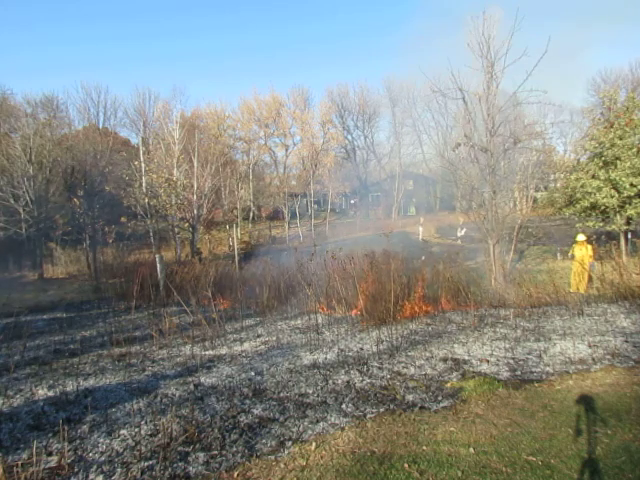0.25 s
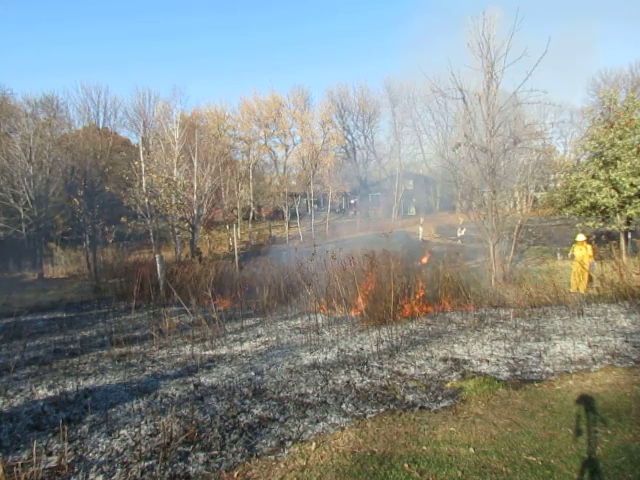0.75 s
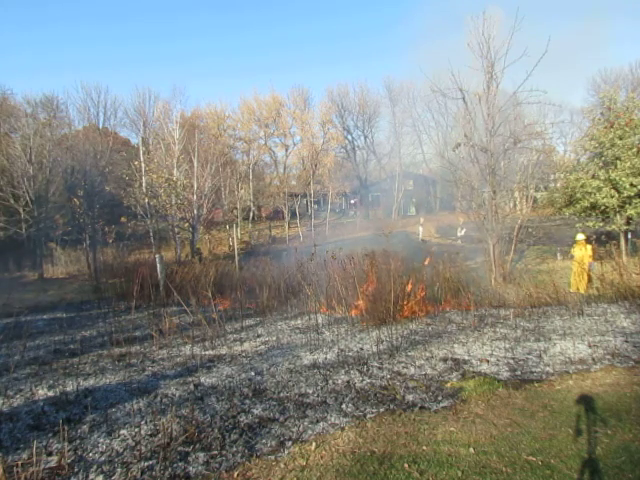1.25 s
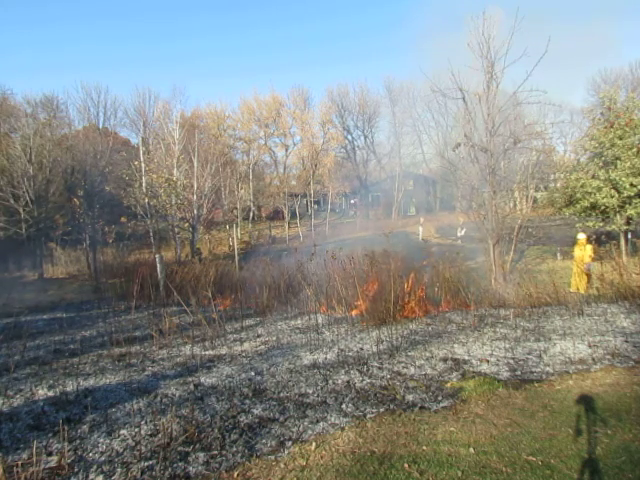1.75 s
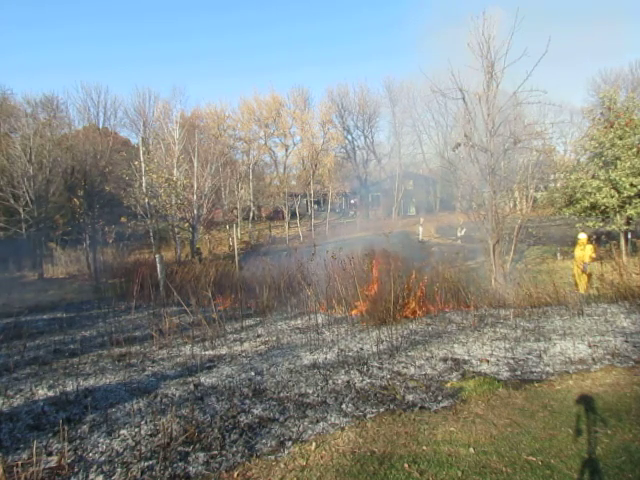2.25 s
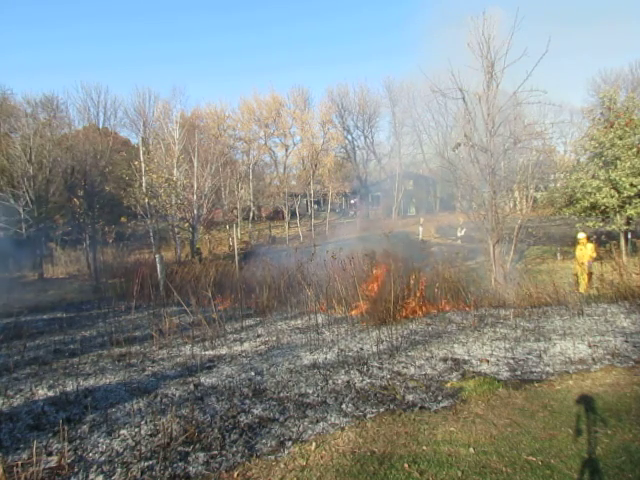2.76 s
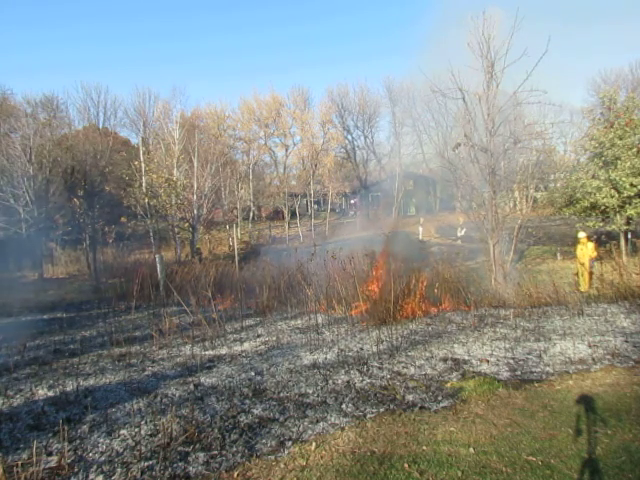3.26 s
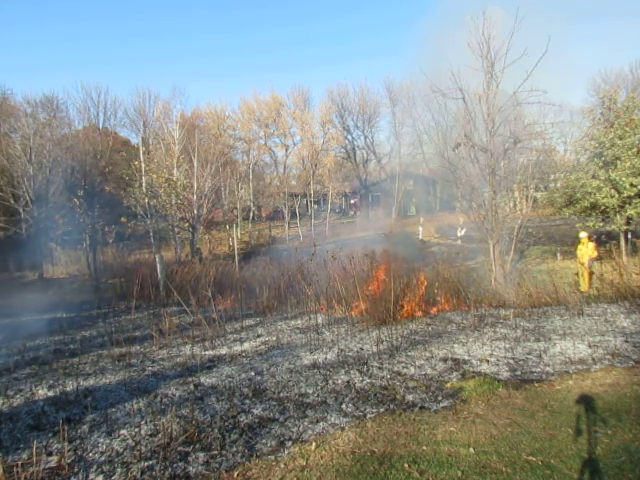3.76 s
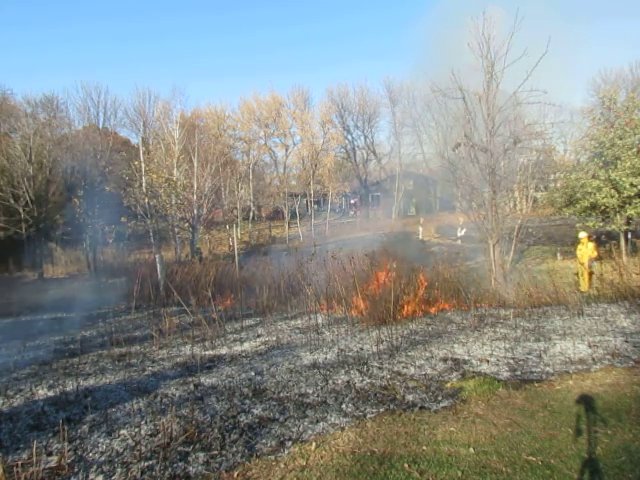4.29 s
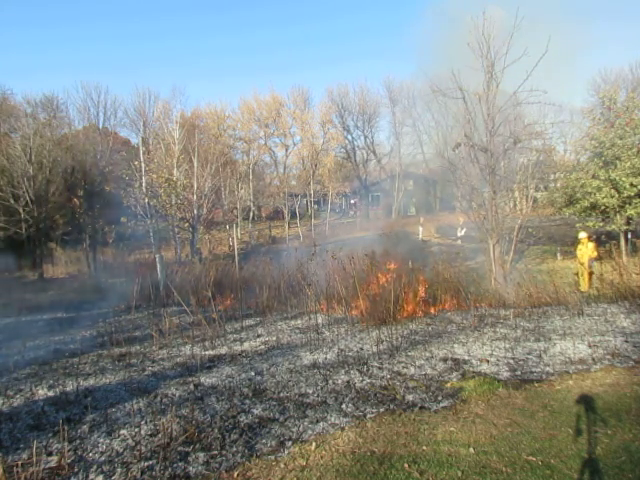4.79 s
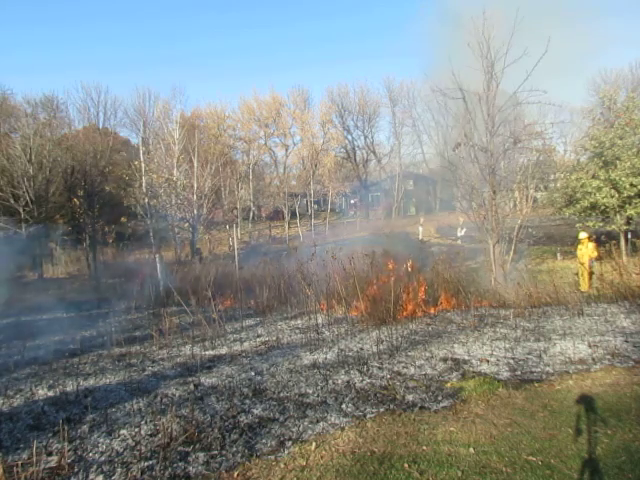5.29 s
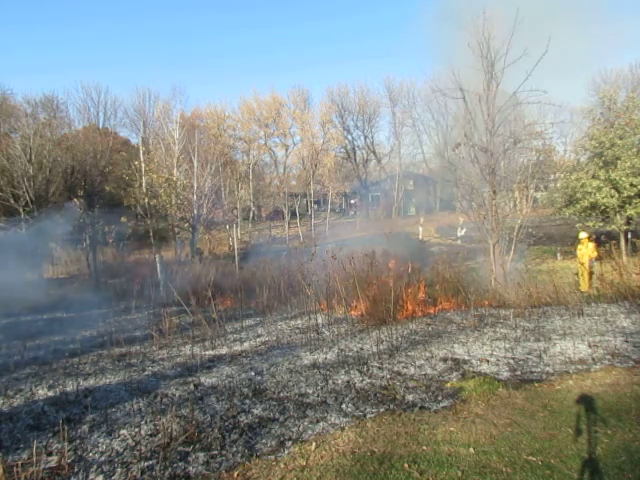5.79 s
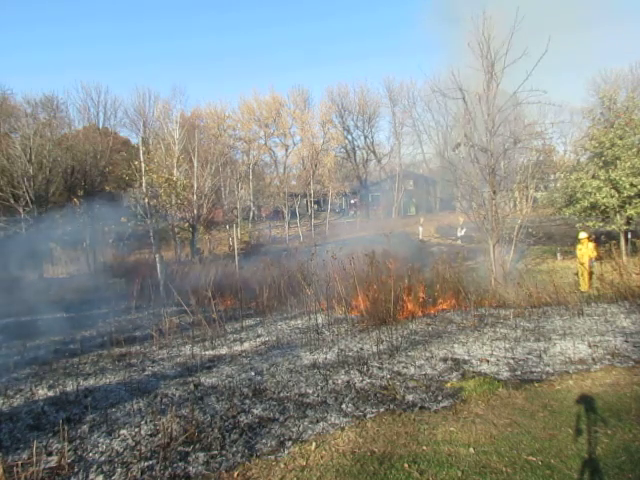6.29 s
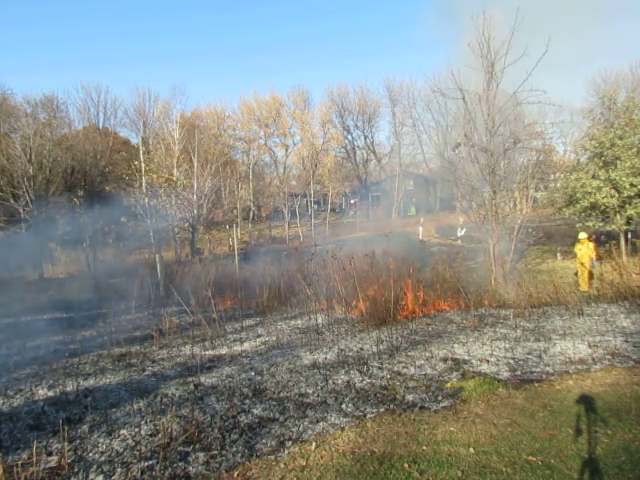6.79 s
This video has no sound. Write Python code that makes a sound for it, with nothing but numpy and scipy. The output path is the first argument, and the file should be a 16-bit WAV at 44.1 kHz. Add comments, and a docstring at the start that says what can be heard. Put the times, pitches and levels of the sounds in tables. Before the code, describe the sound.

Steady crackling of burning brush in an open field, heard in stereo from nearby. Sharp snaps come singly or in quick clusters, each sparking a brief flurry of small clicks and a faint scattered tail off plants and trees. Behind them lies a crisp, fluctuating hiss of flame and a soft low murmur. Breeze gently buffets the microphone, more in the second half, and loud cracks close the stretch.

```python
"""Burning stand of dry stalks

A fire eats through tall dry stalks in an open field, a little way off. Steam bursts the stalks: each pop
is a noisy snap, a resonant hollow and a dull puff. Thin stems tick, and random clicks make a haze of crackles.
Dense grains of noise make the hiss, which rushes up as tufts flare. Ground, stalks, bushes and trees
scatter the cracks; shaped noise gives a low rumble and a breeze that buffets the microphone.
"""
import sys
import numpy as np
from scipy import signal
from scipy.fft import rfft, irfft, next_fast_len
from scipy.io import wavfile

SR = 44100
rng = np.random.default_rng(int(sys.argv[2]) if len(sys.argv) > 2 else 0)


def digitize_waveform(pressure):
    """Quantize a signal to 16-bit integers and store it at the path in sys.argv[1].

    Rows of a 2-D input are taken as channels; values are limited to [-1, 1].
    """
    field = np.atleast_2d(pressure).T
    bounded = np.clip(field, -1, 1)
    quanta = np.round(bounded * 32767).astype(np.int16)
    wavfile.write(sys.argv[1], SR, quanta)


N = 310460

# Bursting hollow stalks: start_s, snap_db, pitch_hz, quality (of the resonance), ring_db, ground_delay_s
POPS = [(0.3387, -3, 3000, 1.35, 5, 0.00015), (0.3711, -4.5, 2450, 0.78, 2, 0.000094),
        (0.4143, 2.5, 4100, 0.86, 6.5, 0.00015), (0.548, -8, 3150, 1.2, -0.5, .0001),
        (0.6496, -8.5, 2600, 0.84, -0.5, 0.00023), (0.6958, -15, 2480, 0.91, 1, 0.00023),
        (0.836, 9.5, 1720, 0.98, 7.5, 0.00026), (1.1837, 6, 2480, 0.5, 6, .00027),
        (1.3072, 8.5, 1510, 0.82, 18, .00027), (1.7085, 2.5, 1900, 0.85, -1, 0.00022),
        (2.1103, 6, 6000, 0.45, 4, 0.00012), (2.1208, 4, 3180, 3, 1.5, 0.00025),
        (2.6275, 3, 2100, 0.8, 6, 0.00027), (2.6935, -9, 2600, 1.55, 10, .00021),
        (2.7513, -11, 1000, 0.12, -7, 0.00031), (3.1455, 1.5, 6270, 1.1, 1, 0.000085),
        (3.1859, 0.5, 8600, 1.1, 6, 0.000086), (3.3074, 2, 1320, 2.4, 0, 0.000079),
        (3.8328, 2, 2300, 0.34, 1, .00011), (4.2644, -1, 1520, 0.53, 0, 0.00034),
        (4.309, -3.5, 2800, 0.45, -4, .00011), (5.1259, -10, 2800, 3.4, -2, .0003),
        (5.153, -26, 1920, 0.84, -5.5, 0.000096), (5.3106, 4, 3020, 4.9, 21.5, .00011),
        (5.8443, -5, 1350, 1.55, 14.5, .00036), (6.9249, 6, 1480, 0.98, 25.5, .00026),
        (7.0047, 14.5, 4400, .7, 23.5, .00013)]
# The loudest thin stems snapping: start_s, level_db, pitch_hz (of the wood)
TICKS = [(0.1356, -4, 7000), (0.1756, -6.5, 4400), (0.319, -1.5, 2400), (0.5143, -3.5, 7200),
         (0.5295, -8, 7000), (0.5565, -11, 7000), (0.632, -10, 3500), (0.8284, 0, 7000), (0.8578, -4, 7000),
         (1.6046, -0.5, 6900), (1.6336, -7.5, 5100), (1.77, -7.5, 9050), (1.9753, -6, 7000),
         (2.2106, -3.5, 3000), (2.2772, -3, 7050), (2.4463, -3.5, 4530), (3.04, -4, 3000),
         (3.155, -1.5, 3500), (3.3782, -11.5, 7000), (3.6248, -4, 7300), (3.8387, 2, 2500),
         (3.9085, -0.5, 5000), (4.0224, -9, 2500), (4.1936, 1.5, 8400), (4.4682, -2, 3530),
         (4.473, -0.5, 4600), (4.5996, -2.5, 8000), (4.655, -5, 2500), (5.2467, -1.5, 6950),
         (5.3058, 0, 4000), (5.5998, -9.5, 7040), (5.6572, -9, 7000), (5.883, -8.5, 3500),
         (6.5955, -0.5, 2840), (6.6079, -4.5, 8100), (6.6658, -4, 4020)]
# Strength of the breeze on the microphone, before its overall level: time_s, relative_level_db
BREEZE = [(0, -36), (0.85, -51), (1.1, -46.5), (2.0, -41), (2.65, -33), (3.55, -45.5), (4.55, -29.5),
          (5.1, -30.5), (5.35, -35.5), (6.2, -33), (7.04, -35.5)]
# Single eddies that hit the microphone: centre_s, peak_db, half_width_s (before skewing)
BUFFETS = [(5.1521, -2.5, 0.0013)]
# How fiercely the fire burns, of which only the swing about the mean counts: time_s, level_db
HEAT = [(0.0, -48.5), (0.55, -45), (0.94, -48), (1.41, -52.5), (2.37, -48), (2.84, -44), (3.33, -44.5),
        (4.39, -43), (5.29, -48.5), (5.71, -48.5), (5.92, -54), (7.04, -48.5)]
# Tufts that catch, swell and die down: peak_s, peak_db, swell_s, depth (0 front to 1 back of the stand)
FLARES = [(0.16, -42, 0.078, 0), (0.37, -44, 0.08, 0.4), (0.72, -43.5, 0.11, 0.9), (1.26, -47.5, 0.3, 0.25),
          (2.72, -34, 0.23, 0), (3.37, -42, 0.077, 0.16), (3.86, -41, 0.09, 0.55), (4.32, -44.5, 0.07, .7),
          (6.96, -31.5, 0.029, 0.6)]

# Tone of snapping walls and stems: frequency_hz, level_db (per Hz)
SNAP_TONE = [(300, -14), (1000, -13), (2000, -8.5), (3000, -6), (5000, -2.5), (8000, .5), (10000, -1.5),
             (12000, -3), (14500, -10.5)]
# Tone of sizzling leaves: frequency_hz, level_db (per Hz)
SIZZLE_TONE = [(500, -1), (2000, 0), (4000, -7.5), (6000, -8.5), (8200, 4.5), (10000, -2), (12000, 3.5),
               (14000, -4), (16000, -45)]
# Tone of rushing flames: frequency_hz, level_db (per Hz)
FLARE_TONE = [(400, -12), (1100, -11), (2200, -11), (3400, -5), (4800, .5), (8000, -2.5), (12000, -5.5),
              (15500, -7)]
# Tone of the hiss from further back in the stand: frequency_hz, level_db (per Hz)
BACK_TONE = [(500, -0.5), (1100, 2.5), (2000, -4), (3200, 1.5), (6000, -1.5), (14000, -28)]
# Tone of the low murmur: frequency_hz, level_db (per Hz)
RUMBLE_TONE = [(20, -17.5), (45, -0.5), (62, 0), (90, -3.5), (140, -4.5), (220, -10.5), (370, -15.5),
               (600, -22), (950, -25), (1800, -38.5), (4000, -46.5)]
# Tone of the eddies at the microphone: frequency_hz, level_db (per Hz)
WIND_TONE = [(20, -10), (60, 4.5), (107, -1), (173, -9.5), (346, -30.5), (600, -29.5), (2000, -55)]
# Stereo lean of the fire: frequency_hz, left_minus_right_db
FIRE_SIDE = [(300, -13.5), (1100, -2.5), (2000, -5), (3000, -4.5), (5000, 2), (6800, -0.5), (8200, -1),
             (11500, -5), (14000, 3)]

# Hiss layers: level at mean heat in dB, share of the heat's dB swing
SIZZLE_DB, SIZZLE_FOLLOWS = -47.5, 0.52
RUSH_DB, RUSH_FOLLOWS = -51.5, 0.53
BACK_DB, BACK_FOLLOWS = -55, 0.5
FLARE_FADE = 1.25   # a tuft's dying time over its swell time
# Small crackles: base rate at mean heat, share of the heat's dB swing
CRACKLES_PER_S, CRACKLES_FOLLOW = 69, 0.36
# After each pop or loud tick: extra share of the crackle rate, and its decay time
FLURRY_GAIN, FLURRY_S = 1.8, 0.038
# Weaker ticks: level at mean heat, random range either way, share of the heat's dB swing
LESSER_TICK_DB, LESSER_SPREAD_DB, LESSER_FOLLOWS = -11.5, 2.5, 0.4
GROUND_ECHO, GROUND_CUT_HZ = 0.78, 6500   # gain of the ground's echo at low pitch, where it dulls
FAR_SEND_DB = -16   # how much of the hollow's note is sent to the trees
CUTOFF_HZ = 16100

TIME = np.arange(N) / SR
SIZE = next_fast_len(N + SR)   # padded length for filtering
HZ = np.maximum(np.arange(SIZE // 2 + 1) * SR / SIZE, 1)


def fire():
    """Pops, ticks, crackles and three kinds of hiss, with a stereo lean that varies with pitch."""
    heat_db = heat()
    front_power, back_power = flares()
    snaps, hollows, carried = pops(puff_db=-22.0, puff_hz=660, puff_quality=0.18)
    small = ticks() + crackles(level_db=-30.0, ring_db=1, clump_db=1.5, quality=3.8)
    cracks = field(snaps + small, hollows, carried)
    sizzle_gain = from_db(SIZZLE_DB + SIZZLE_FOLLOWS * heat_db)
    # Flaring tufts add their power to the steady rush
    rush_gain = from_db(RUSH_DB + RUSH_FOLLOWS * heat_db)
    flare_gain = np.sqrt(rush_gain ** 2 + front_power)
    steady_back_gain = from_db(BACK_DB + BACK_FOLLOWS * heat_db)
    back_gain = np.sqrt(steady_back_gain ** 2 + back_power)
    sizzle = sizzle_gain * fizz(SIZZLE_TONE, per_s=3000, spread_db=4.0, flicker_db=4.5, alike=0.19)
    flare = flare_gain * fizz(FLARE_TONE, per_s=22000, spread_db=4.0, flicker_db=2.0, alike=0.41)
    back = back_gain * fizz(BACK_TONE, per_s=4800, spread_db=7.5, flicker_db=3.5, alike=0.63)
    left, right = cracks + sizzle + flare + back
    side_db = at_hz(FIRE_SIDE) / 2
    return np.array([colour(left, side_db), colour(right, -side_db)])


def pops(puff_db, puff_hz, puff_quality):
    """Each burst is a bright snap of the wall, a few cycles of the hollow and a dull puff of steam."""
    snaps, hollows, carried = np.zeros((3, N))
    for start_s, snap_db, hz, quality, ring_db, delay_s in POPS:
        snap = from_db(snap_db) * tear(level_db=-4.5, t60=0.003)
        push = -from_db(ring_db) * signal.unit_impulse(len(snap))
        hollow = ring(ring(push, hz, quality), hz, quality)
        puff = from_db(puff_db) * ring(push, puff_hz, puff_quality)
        add(snaps, start_s, off_ground(snap, delay_s))
        add(hollows, start_s, off_ground(hollow + puff, delay_s))
        add(carried, start_s, from_db(FAR_SEND_DB) * off_ground(hollow, delay_s))
    return colour(snaps, at_hz(SNAP_TONE)), hollows, carried


def tear(level_db, t60):
    """A wall splits in one sharp crack and a few lesser ones just after; energy 1, 20 ms long."""
    t = TIME[:SR // 50]
    splinters = rng.standard_normal(len(t)) * from_db(-60 * t / t60)
    splinters /= np.linalg.norm(splinters)
    crack = -signal.unit_impulse(len(t)) + from_db(level_db) * splinters
    return crack / np.linalg.norm(crack)


def ticks():
    """Thin stems snap brightly, each with a short woody ring."""
    out = np.zeros(N)
    for start_s, level_db, hz in TICKS + lesser_ticks(count=32):
        snap = from_db(level_db) * tear(level_db=2.5, t60=0.0017)
        wood = from_db(-7) * ring(snap, hz, quality=1.5)
        add(out, start_s, snap + wood)
    return colour(out, at_hz(SNAP_TONE))


def lesser_ticks(count):
    """Weaker snaps, one somewhere in each equal stretch of time, louder where the fire is hot."""
    start_s = (np.arange(count) + rng.random(count)) * TIME[-1] / count
    heat_db = np.interp(start_s, TIME, heat())
    chance_db = LESSER_SPREAD_DB * rng.uniform(-1, 1, count)
    level_db = LESSER_TICK_DB + LESSER_FOLLOWS * heat_db + chance_db
    pitch_hz = rng.uniform(2000, 7000, count)
    return list(zip(start_s, level_db, pitch_hz))


def crackles(level_db, ring_db, clump_db, quality):
    """Leaves and husks split in clusters, each click ringing at one of fourteen pitches."""
    per_s = CRACKLES_PER_S * from_db(CRACKLES_FOLLOW * heat()) * flurries()
    clumped_per_s = per_s * from_db(clump_db * drift(9))
    clicks = grains(clumped_per_s, spread_db=5.5, most_db=15)
    pitches = np.geomspace(2500, 12000, num=14)
    dealt = rng.integers(0, len(pitches), N)   # which pitch each click gets
    stems = sum(ring(clicks * (dealt == k), hz, quality) for k, hz in enumerate(pitches))
    return from_db(level_db) * colour(clicks + from_db(ring_db) * stems, at_hz(SNAP_TONE))


def flurries():
    """Factor on the crackle rate: it jumps at every pop and loud tick, then settles."""
    moments = np.sort([-np.inf] + [row[0] for row in POPS + TICKS])
    since = TIME - moments[np.searchsorted(moments, TIME) - 1]
    return 1 + FLURRY_GAIN * np.exp(-since / FLURRY_S)


def heat():
    """The fire's vigour in dB about its mean."""
    level_db, = in_time(HEAT)
    return level_db - level_db.mean()


def flares():
    """Power of the flaring tufts, shared between the front and the back of the stand."""
    front, back = np.zeros((2, N))
    for peak_s, peak_db, swell_s, depth in FLARES:
        amplitude = from_db(peak_db) * surge(peak_s, swell_s, FLARE_FADE * swell_s)
        power = (amplitude + 1e-9) ** 2
        depth = np.clip(depth, 0, 1)
        front += (1 - depth) * power
        back += depth * power
    return front, back


def surge(peak_s, rise_s, fall_s):
    """Grows exponentially to 1 at its peak, then dies away."""
    before = np.maximum(peak_s - TIME, 0)
    after = np.maximum(TIME - peak_s, 0)
    return np.exp(-before / rise_s - after / fall_s)


def fizz(spectrum, per_s, spread_db, flicker_db, alike):
    """Thousands of tiny ruptures a second merge into a grainy hiss; rms 1 before it flickers."""
    mid = rms_one(grains(per_s, spread_db, most_db=17))
    both = pair(mid, rng.standard_normal(N), alike)
    return rms_one(colour(both, at_hz(spectrum))) * from_db(flicker_db * drift(40))


def field(snaps, hollows, carried):
    """Nearby stalks and bushes smear each crack; the far trees give a faint long tail."""
    direct = snaps + hollows
    stalks = spray(snaps, level_db=-2.5, t60=0.0065)
    bushes = scatter(direct, level_db=-8, t60=0.023)
    trees = scatter(snaps, level_db=-10.5, t60=0.21) + scatter(carried, level_db=-1, t60=1.0)
    return direct + stalks + bushes + trees


def off_ground(x, delay_s):
    """Soft ground returns a dull copy a fraction of a millisecond later."""
    hz = np.arange(len(x) // 2 + 1) * SR / len(x)
    dull = GROUND_ECHO / (1 + (hz / GROUND_CUT_HZ) ** 2)
    echo = dull * np.exp(-2j * np.pi * hz * delay_s)
    return irfft(rfft(x) * (1 + echo), len(x))


def spray(x, level_db, t60):
    """Every crack sits among other stalks, so its first reflections are new each time."""
    pole = from_db(-120 / (t60 * SR))   # power loses 60 dB of level in t60
    power = signal.lfilter([0, 1 - pole], [1, -pole], x ** 2 + 1e-18)
    return from_db(level_db) * colour(np.sqrt(power) * rng.standard_normal((2, N)), at_hz(SNAP_TONE))


def scatter(x, level_db, t60):
    """Countless weak reflections that die away over at most half a second, different at each ear."""
    t = TIME[:SR // 2]
    echoes = rng.standard_normal((2, len(t))) * from_db(-60 * t / t60)
    echoes /= np.sqrt(np.sum(echoes ** 2, axis=1, keepdims=True))
    return from_db(level_db) * signal.oaconvolve(x[None], echoes, axes=1)[:, :N]


def rumble(level_db, alike):
    """The steady low murmur of flames and open country, as shaped noise."""
    noise = pair(*rng.standard_normal((2, N)), alike)
    return from_db(level_db) * rms_one(colour(noise, at_hz(RUMBLE_TONE)))


def wind(level_db, lumps_db, alike, right_db):
    """Eddies push the two ports mostly in opposite directions, the left one harder."""
    breeze_db, = in_time(BREEZE)
    noise = pair(*rng.standard_normal((2, N)), alike)
    eddies = rms_one(colour(noise, at_hz(WIND_TONE)))
    out = eddies * from_db(breeze_db + level_db + lumps_db * drift(17))
    for centre_s, peak_db, half_width_s in BUFFETS:
        u = (TIME - centre_s) / half_width_s
        u = u * (1 - 0.29 * np.tanh(u))   # a quick first swing, then a slower opposite one
        out = out + from_db(peak_db) * u * np.exp((1 - u ** 2) / 2) * np.array([[1], [-1]])
    return out * from_db([[0], [right_db]])


def ports(x, quality):
    """The microphone's ports hold some pitches back, drawing each click out to a few cycles."""
    for hz in (3200, 6500, 9500):
        x = x - 2 * ring(x, hz, quality)   # all-pass: shifts timing, keeps level
    return x


def gain_control(x, threshold_db, share, release_db_per_s, attack_s):
    """The gain ducks just after a loud peak and creeps back."""
    peak_db = 20 * np.log10(np.abs(x).max(axis=0) + 1e-9)
    over_db = np.maximum(peak_db - threshold_db, 0)
    release_db = release_db_per_s * TIME
    held_db = np.maximum.accumulate(over_db + release_db) - release_db
    pole = np.exp(-1 / (attack_s * SR))
    smooth_db = signal.lfilter([1 - pole], [1, -pole], held_db)
    return x * from_db(-share * smooth_db)


def from_db(db):
    """Decibels to gain."""
    return 10 ** (np.asarray(db) / 20)


def rms_one(x):
    """Scale to rms 1."""
    return x / np.sqrt(np.mean(x ** 2) + 1e-20)


def in_time(rows):
    """Columns of a curve table at every sample."""
    time_s, *columns = np.transpose(rows)
    return [np.interp(TIME, time_s, column) for column in columns]


def at_hz(points):
    """A spectrum table on the frequency grid, interpolated over log frequency."""
    hz, db = np.transpose(points)
    return np.interp(np.log(HZ), np.log(hz), db)


def colour(x, db):
    """Causal (minimum-phase) filter with the given dB curve."""
    cepstrum = irfft(np.log(from_db(db)), SIZE)
    # Folding the cepstrum forward makes the filter causal
    cepstrum[1:SIZE // 2] *= 2
    cepstrum[SIZE // 2 + 1:] = 0
    response = np.exp(rfft(cepstrum))
    return irfft(rfft(x, SIZE) * response, SIZE)[..., :N]


def drift(rate):
    """Smooth chance with rms 1, changing about rate times a second."""
    spectrum = rfft(rng.standard_normal(SIZE)) / (1 + (HZ / rate) ** 2)
    return rms_one(irfft(spectrum, SIZE)[:N])


def pair(mid, side, alike):
    """Two unrelated signals of rms 1 to left and right with the given correlation."""
    alike = np.clip(alike, -1, 1)
    return rms_one(np.sqrt(1 + alike) * mid + np.sqrt(1 - alike) * side * np.array([[1], [-1]]))


def ring(x, hz, quality):
    """A damped resonance with gain 1 on top."""
    hz = min(hz, 0.4 * SR)
    quality = max(quality, 3 * hz / SR)   # keeps the band from growing too wide
    return signal.lfilter(*signal.iirpeak(hz, quality, fs=SR), x + 1e-18)


def grains(per_s, spread_db, most_db):
    """Random clicks of either sign, many small and few large."""
    sizes = from_db(np.minimum(spread_db * rng.exponential(1, N), most_db))
    return (rng.random(N) < per_s / SR) * sizes * rng.choice([-1, 1], N)


def add(track, start_s, sound):
    """Mix a short sound into a track at its start time."""
    at = round(start_s * SR)
    track[at:at + len(sound)] += sound[:N - at]


def scene():
    """Fire, rumble and breeze."""
    low = rumble(level_db=-38.0, alike=0.25)
    breeze = wind(level_db=5.5, lumps_db=3.0, alike=-0.88, right_db=-5.5)
    return fire() + low + breeze


def record(dry):
    """Loud peaks duck the gain, what still overloads is clipped, and the top is cut."""
    heard = ports(dry, quality=2.2)
    ducked = gain_control(heard, threshold_db=-3.5, share=0.75, release_db_per_s=9.5, attack_s=0.0036)
    clipped = np.clip(ducked, -1, 1)
    top_cut = signal.cheby1(14, 0.02, CUTOFF_HZ, fs=SR, output="sos")
    return signal.sosfiltfilt(top_cut, clipped)


dry = scene()
out = record(dry)
digitize_waveform(out)
```